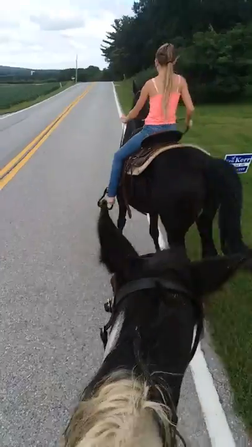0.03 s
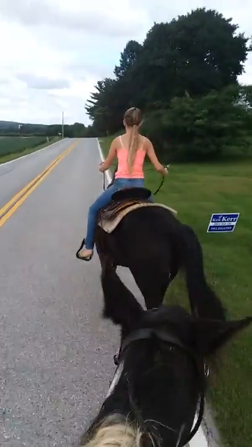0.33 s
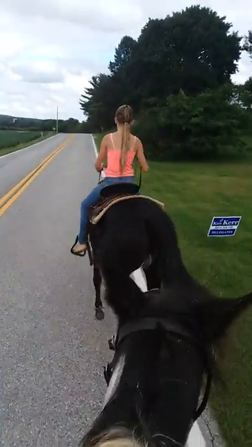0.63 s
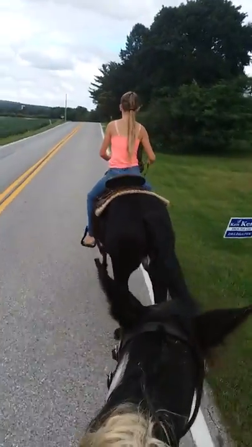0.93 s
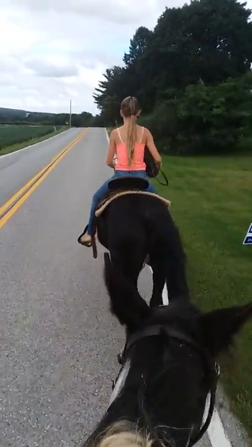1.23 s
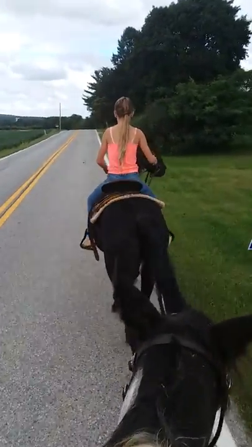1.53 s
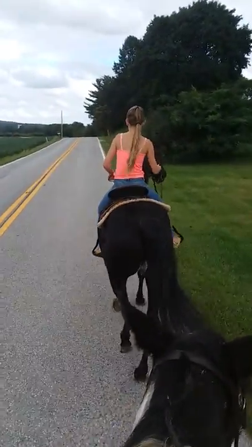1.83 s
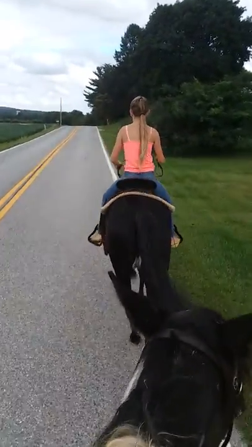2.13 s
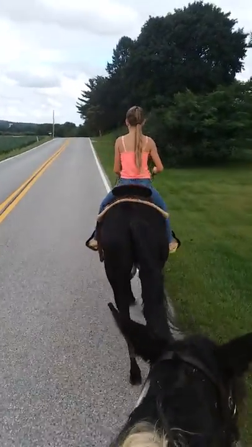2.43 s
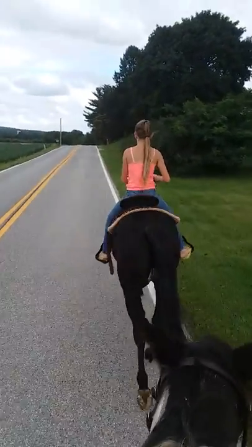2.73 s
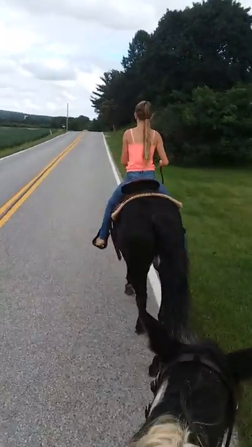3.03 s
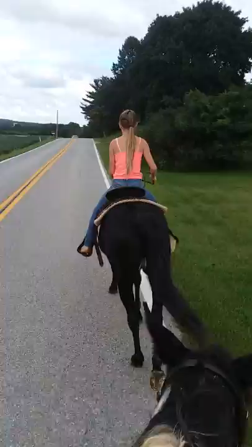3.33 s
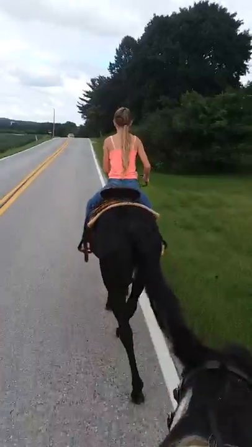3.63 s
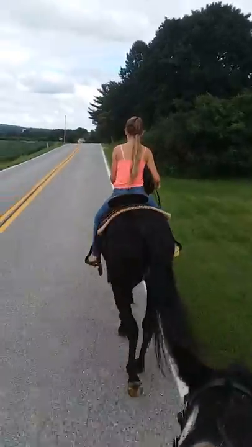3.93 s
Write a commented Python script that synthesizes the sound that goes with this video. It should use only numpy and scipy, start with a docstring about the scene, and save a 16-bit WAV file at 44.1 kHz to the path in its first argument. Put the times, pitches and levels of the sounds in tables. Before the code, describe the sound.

Horse hooves clip-clop unevenly on asphalt, with a faint cricket and light wind.

```python
"""Two horses walk an asphalt country road, heard from the saddle of the second one.
Each hoof knocks as its hollow and wall ring briefly; sliding hooves scuff the grit.
A cricket in the verge chirps with its wings, fading to the left as they pass.
The ride jostles the microphone and light wind buffets it, over a low outdoor murmur and hiss."""
import sys
import numpy as np
from scipy import signal
from scipy.fft import rfft, irfft
from scipy.io import wavfile

SR = 44100
rng = np.random.default_rng(int(sys.argv[2]) if len(sys.argv) > 2 else 0)


def transcribe(signal):
    """Save signal, clipped to [-1, 1], as a 16-bit WAV file at the path in sys.argv[1]."""
    frames = np.atleast_2d(signal).T
    limited = np.clip(frames, -1, 1)
    pcm = np.round(limited * 32767).astype(np.int16)
    wavfile.write(sys.argv[1], SR, pcm)


N = 176400
TIME = np.arange(N) / SR
GRIT_PAN_DB = 9


def hooves():
    """Each landing rings the hoof's hollow (cup) and wall, with a clack and a tick of stone."""
    # t/s, level/dB, cup f/Hz, wall f/Hz, wall re cup/dB, clack f/Hz, clack re cup/dB, ring/s
    landings = [(.2632, -19, 790, 994, -11.5, 2240, -20, 0.0012),
                (.4666, -28, 830, 1236, 0.5, 2400, -17, 0.0018),
                (.5875, -44, 765, 1280, -10, 2430, 4.5, 0.0011),
                (0.8267, -49.5, 830, 1300, 7.5, 2470, 6, 0.0024),
                (1.0187, -29.5, 775, 1170, 4, 1920, -7.5, 0.001),
                (1.3065, -41.5, 830, 1130, -22, 2300, -30, 0.0011),
                (1.3898, -25.5, 783, 1267, -9, 2230, -15, 0.0014),
                (1.5686, -28.5, 734, 1260, 7, 2360, -10.5, 0.0015),
                (2.1760, -21.5, 845, 1147, -2, 2080, -19, .0011),
                (2.1827, -37, 900, 1190, 3.5, 2050, -21, .0011),
                (2.5327, -15.5, 852, 1056, -6, 2400, -25, .0011),
                (2.5395, -28, 740, 1070, 3.5, 2260, -25, 0.00065),
                (2.5655, -39.5, 760, 1200, -7, 2320, -17, 0.00081),
                (2.7143, -31.5, 864, 1276, -2.5, 2150, -15, 0.0018),
                (2.7303, -32, 680, 1230, -10, 2300, -27, 0.00089),
                (3.0612, -49, 880, 1330, 9, 2300, -20, 0.0015),
                (3.2385, -34.5, 706, 1230, -24, 2490, -13, 0.00077),
                (3.2905, -30.5, 710, 1110, -16, 2300, -27, 0.0011),
                (3.3320, -41, 675, 1130, 4.5, 2330, -10, 0.0011),
                (3.6137, -12.5, 840, 1052, -5.5, 2250, -9, 0.0011),
                (3.7920, -31.5, 830, 1264, 5.5, 2140, -30, 0.0012),
                (3.8020, -25.5, 746, 1080, -13, 2230, -14, .0008),
                (3.9105, -37.5, 810, 1130, -21, 2300, -19, .0015)]
    wall_lag_s, clack_ring_s, tick_s = 0.00027, 0.00076, 0.00087
    cup_skew_s, wall_skew_s, clack_skew_s = -0.000028, 0.00009, 0.00005  # right port after left when positive; the cup reaches the right port first
    ports = np.array([[-0.5], [0.5]])
    t = np.arange(SR // 20) / SR
    tick_envelope = amp(-29) * t / tick_s * np.exp(-t / tick_s)
    tick_lowpass = signal.butter(1, 6000, fs=SR)
    out = np.zeros((2, N))
    for s, db, cup_hz, wall_hz, wall_db, clack_hz, clack_db, ring_s in landings:
        cup = mode(t - ports * cup_skew_s, cup_hz, ring_s)
        wall = mode(t - wall_lag_s - ports * wall_skew_s, wall_hz, 1.21 * ring_s)
        wall *= pan(db=1.1) * amp(wall_db)
        clack = mode(t - ports * clack_skew_s, clack_hz, clack_ring_s)
        clack *= pan(db=-1.3) * amp(clack_db)
        tick = pan(GRIT_PAN_DB) * tick_envelope * rng.standard_normal((2, len(t)))
        add(out, s, amp(db) * (cup + wall + clack + signal.lfilter(*tick_lowpass, tick)))
    return signal.lfilter(*signal.butter(2, 197, "high", fs=SR), out)


def scuffs():
    """Showers of grit clicks under a sliding hoof, over a faint continuous crunch."""
    slides = [(.002, 0.038, -57.5, -13), (.457, 0.025, -42.5, -26), (0.512, 0.01, -50, -25),
              (0.526, 0.026, -51, -21), (0.578, 0.018, -46.5, -24.5), (.820, 0.019, -45, -28),
              (1.017, 0.013, -37.5, -35), (1.386, 0.013, -41, -34), (1.589, 0.023, -61.5, -10),
              (1.158, 0.023, -59.5, -24), (2.309, 0.0095, -50.5, -26), (2.538, 0.011, -46, -25),
              (2.702, .042, -48.5, -26), (2.827, 0.021, -61.5, -16.5), (2.999, 0.085, -60, -17),
              (3.238, 0.013, -48.5, -25), (3.311, 0.074, -56.5, -18.5), (3.67, 0.0069, -73, 3),
              (3.777, 0.03, -56.5, -23), (3.842, 0.16, -64, -18)]  # t/s, length/s, level/dB, sand re scrape/dB
    crunch_levels = [(0, -68), (.5, -63), (.75, -72), (1.15, -62.5), (1.3, -81), (1.65, -57), (2.1, -88),
                     (2.25, -55.5), (2.48, -78), (2.6, -66), (3.2, -62), (3.4, -57), (3.5, -63),
                     (3.7, -60.5), (4, -57.5)]  # grit between landings: t/s, level/dB
    scrape_spectrum = [(300, -26), (700, 12.5), (1350, 7), (1750, -1.5), (2450, -1.5), (3000, -19),
                       (4500, -37.5), (9000, -56)]  # midrange: f/Hz, level/dB
    sand_spectrum = [(1500, -31), (3000, -7.5), (4500, -3.5), (6000, -10), (8000, -10), (11000, -13),
                     (16000, -24)]  # treble: f/Hz, level/dB
    clicks_per_s, spread_db = 2500, 2.5
    grit = rng.standard_normal((3, N)) * (rng.random(N) < clicks_per_s / SR)
    grit *= amp(spread_db * np.minimum(rng.exponential(1, N), 3))
    grit = unit(grit[2] + 1.8 * grit[:2])  # common + per channel
    scrape = grit * curve(crunch_levels)
    sand = np.zeros((2, N))
    for s, length_s, db, sand_db in slides:
        clicks = grit[:, round(s * SR):][:, :round(length_s * SR)]
        envelope = np.sin(np.pi * np.linspace(0, 1, clicks.shape[1]) ** 0.52)  # peaks early
        stroke = amp(db) * unit(clicks * envelope)
        add(scrape, s, stroke)
        add(sand, s, amp(sand_db) * stroke)
    return colour(scrape, scrape_spectrum) + pan(GRIT_PAN_DB) * colour(sand, sand_spectrum)


def cricket():
    """Each chirp is a soft lead-in and three slightly raspy wing strokes."""
    chirps = [(.099, -49, 3), (.499, -52.5, 4.5), (.848, -55, 8), (1.203, -56, 7), (1.498, -61, 12),
              (1.772, -66.5, 14), (2.048, -70.5, 18), (2.345, -71, 18), (2.635, -75, 18), (2.956, -71, 16),
              (3.294, -70.5, 19), (3.614, -69, 17), (3.917, -73, 23)]  # t/s, level/dB, left minus right/dB
    wing_hz, stroke_period_s, overtone_db = 5082, 0.0415, -27
    lead_s, lead_db = 0.027, -14
    out = np.zeros((2, N))
    for s, db, side_db in chirps:
        gain = amp(db) * pan(side_db / 2)
        envelope, phase = wing_stroke(length_s=0.021, hz=0.985 * wing_hz)
        add(out, s - lead_s, gain * amp(lead_db) * envelope * np.sin(phase))
        for k, detune in enumerate(1 + 0.0026 * rng.standard_normal(3)):
            envelope, phase = wing_stroke(length_s=0.025, hz=wing_hz * detune)
            tone = np.sin(phase) + amp(overtone_db) * np.sin(2 * phase)
            add(out, s + k * stroke_period_s, gain * envelope * tone)
    rasp = 1 + 0.25 * wander(hz=600)
    return out * rasp


def wing_stroke(length_s, hz, sag_hz=520):
    """Envelope and phase of a tone that sags as the wing slows."""
    u = np.linspace(0, 1, round(length_s * SR))
    pitch_hz = hz - sag_hz * u ** 3.9
    return np.sin(np.pi * u) ** 1.26, 2 * np.pi * np.cumsum(pitch_hz) / SR


def roadside(x):
    """Adds two near reflections, a quick scatter and a faint return from the trees."""
    echoes = [(.0027, 0.00345, -14), (.0063, .0054, -15.5)]  # off road and horses: left delay/s, right delay/s, level/dB
    t = np.arange(SR // 2) / SR
    onset = np.minimum(t / 0.015, 1)
    response = np.zeros((2, len(t)))
    for db, t60_s in ((-16, 0.05), (-24, 0.5)):  # scatter, trees
        tail = rng.standard_normal((2, len(t))) * amp(-60 * t / t60_s) * onset
        response += amp(db) * unit(tail) / np.sqrt(len(t))
    response[:, 0] += 1  # direct path
    for left_s, right_s, db in echoes:
        response[[0, 1], [round(left_s * SR), round(right_s * SR)]] += amp(db)
    return signal.fftconvolve(x, response, axes=1)[:, :N]


def bumps():
    """The ride jostles the microphone; dull thumps reach its two ports out of step."""
    jolts = [(.322, -32, 120), (.615, -31.5, 105), (.72, -32.5, 170), (.925, -30.5, 130), (1.028, -36, 135),
             (1.40, -31.5, 210), (1.434, -27.5, 300), (1.477, -22, 328), (1.932, -33, 130),
             (2.896, -34, 220), (3.32, -48, 110), (3.385, -31.5, 100), (3.553, -34, 160)]  # t/s, level/dB, f/Hz
    right_lag_s = 0.0012
    t = np.arange(SR // 15) / SR - np.array([[0], [right_lag_s]])
    out = np.zeros((2, N))
    for s, db, hz in jolts:
        add(out, s, amp(db) * mode(t, hz, ring_s=0.004))
    return out


def wind():
    """Lumpy buffets and rumble, from separate noise at each microphone port."""
    buffet_levels = [(0, -47), (.17, -45.5), (.32, -39.5), (.39, -62.5), (.47, -39), (.56, -61), (.73, -60),
                     (.86, -41.5), (.98, -38), (1.04, -39), (1.12, -52), (1.24, -45), (1.37, -47.5),
                     (1.415, -34), (1.49, -34), (1.55, -49.5), (2.05, -51), (2.45, -58.5), (2.7, -55),
                     (2.9, -51), (3.2, -49), (3.305, -50.5), (3.34, -39), (3.41, -45), (3.5, -73),
                     (3.59, -40), (3.72, -62), (4, -48)]  # t/s, level/dB
    rumble_levels = [(0, -49.5), (.28, -45.5), (.56, -48), (.84, -44), (1.0, -43), (1.13, -51.5),
                     (1.32, -48), (1.44, -42.5), (1.6, -51.5), (2.5, -52), (3.05, -50), (3.45, -53.5),
                     (4, -51.5)]  # t/s, level/dB
    buffet_spectrum = [(20, -51), (60, -51), (150, 1), (300, 0.5), (450, -3.5), (650, -15.5), (1000, -24.5),
                       (2000, -35.5), (5000, -68)]  # f/Hz, level/dB
    rumble_spectrum = [(20, -45), (33, -18), (52, -7.5), (78, 1), (120, 2), (180, -6), (300, -16),
                       (900, -70)]  # f/Hz, level/dB
    buffet, rumble = rng.standard_normal((2, 2, N))
    lumps = unit(amp(5.5 * np.tanh(wander(hz=32))))
    buffet = colour(buffet * lumps, buffet_spectrum) * curve(buffet_levels)
    rumble = colour(rumble, rumble_spectrum) * curve(rumble_levels)
    return buffet * amp(0.5) * pan(db=-2.8) + rumble * amp(3) * pan(db=-1.55)


def murmur():
    """A soft, restless outdoor wash."""
    spectrum = [(25, -25), (100, 1.5), (400, 6.5), (750, 0.5), (1100, -3.5), (1400, -12.5), (1750, -27),
                (2300, -44), (3200, -31), (6000, -42.5)]  # f/Hz, level/dB
    levels = [(0, -58.5), (.6, -48.5), (1.1, -51), (1.7, -51.5), (2.12, -57), (2.26, -49.5), (2.48, -57),
              (2.85, -53.5), (3.18, -59), (3.36, -55), (3.52, -54), (4, -49)]  # t/s, level/dB
    correlation, flutter_db = 0.4, 2.5
    left, right, common = rng.standard_normal((3, N))
    noise = np.sqrt(correlation) * common + np.sqrt(1 - correlation) * np.array([left, right])
    flutter = unit(amp(flutter_db * wander(hz=25)))
    return colour(noise * flutter, spectrum) * curve(levels) * pan(db=-1.6)


def hiss():
    """Steady microphone noise, different in each channel."""
    left_spectrum = [(1000, -1), (3200, -10), (4500, -3.5), (5100, -8.5), (5700, -24), (6500, -6),
                     (7250, -2), (8000, -10), (9000, -13.5), (11000, -8), (14000, -0.5), (16000, -0.5)]  # f/Hz, level/dB
    right_spectrum = [(1000, 21), (4500, 6), (5700, 1), (9000, 0), (12000, 1), (16000, -19.5)]  # f/Hz, level/dB
    left_db, right_db = -58.5, -69
    left = amp(left_db) * colour(rng.standard_normal(N), left_spectrum)
    right = amp(right_db) * colour(rng.standard_normal(N), right_spectrum)
    return np.array([left, right])


def hum_and_whine():
    """Two steady sines, one low and one very high."""
    tones = [(120.6, -56, 0), (14001, -84, -1.5)]  # f/Hz, rms level/dB, pan/dB
    return sum(amp(db) * pan(pan_db) * np.sqrt(2) * np.sin(2 * np.pi * hz * TIME)
               for hz, db, pan_db in tones)


def mode(t, hz, ring_s):
    """Heavily damped resonance that swells for ring_s and dies."""
    u = np.maximum(t, 0) / ring_s
    return -u * np.exp(1 - u) * np.sin(2 * np.pi * hz * t)


def colour(x, spectrum):
    """Filters by (f/Hz, level/dB) points, keeping the power of white noise."""
    hz, db = np.transpose(spectrum)
    gain = amp(np.interp(np.log(np.fft.rfftfreq(N, 1 / SR) + 1), np.log(hz), db))
    return irfft(rfft(x) * unit(gain), N)


def wander(hz):
    """Unit-rms random motion, rolled off above hz."""
    rolloff = (1 + (np.fft.rfftfreq(N, 1 / SR) / hz) ** 2) ** 2
    return unit(irfft(rfft(rng.standard_normal(N)) / rolloff, N))


def curve(levels):
    """Gain over time from (t/s, level/dB) points."""
    return amp(np.interp(TIME, *np.transpose(levels)))


def add(mix, s, sound):
    """Mixes a sound in at time s."""
    part = mix[..., max(round(s * SR), 0):][..., :sound.shape[-1]]
    part += sound[..., :part.shape[-1]]


def amp(db):
    """Decibels to gain."""
    return 10 ** (np.asarray(db) / 20)


def unit(x):
    """Scales to unit rms."""
    return x / np.sqrt(np.mean(x ** 2) + 1e-20)


def pan(db):
    """Left up and right down by db."""
    return amp([[db], [-db]])


def scene():
    """Horses and cricket with roadside reflections, plus bumps, wind and murmur."""
    return roadside(hooves() + scuffs() + cricket()) + bumps() + wind() + murmur()


def record(dry):
    """Adds hiss, hum and whine, then limits the band."""
    cutoff_hz = 15850
    lowpass = signal.firwin(601, cutoff_hz, window=("kaiser", 9), fs=SR)
    return signal.oaconvolve(dry + hiss() + hum_and_whine(), lowpass[None], "same")


dry = scene()
out = record(dry)
transcribe(out)
```